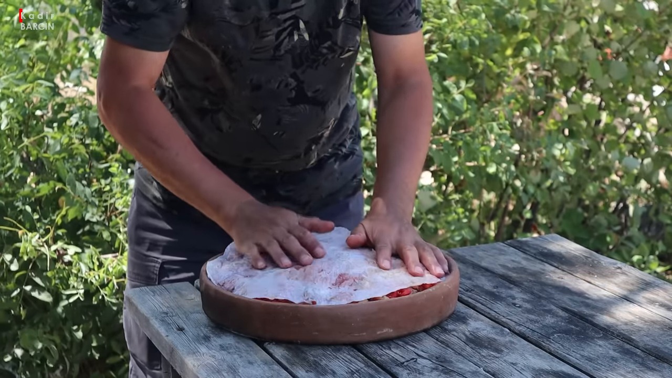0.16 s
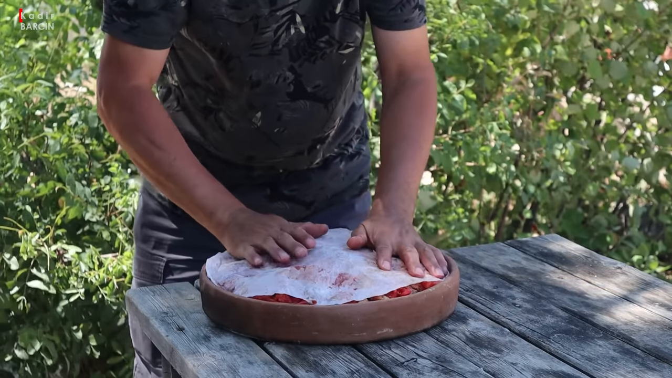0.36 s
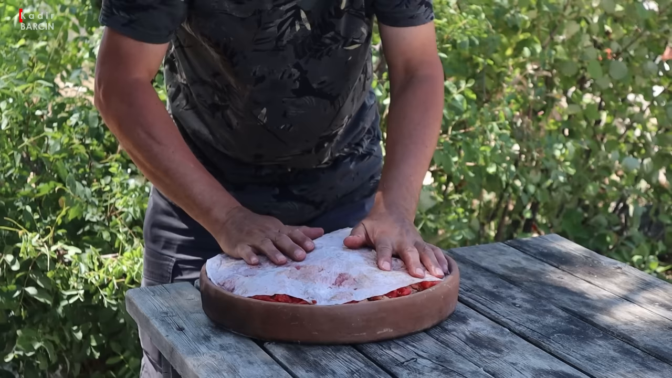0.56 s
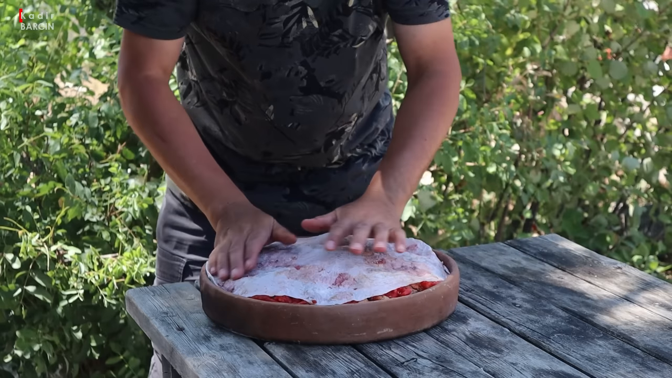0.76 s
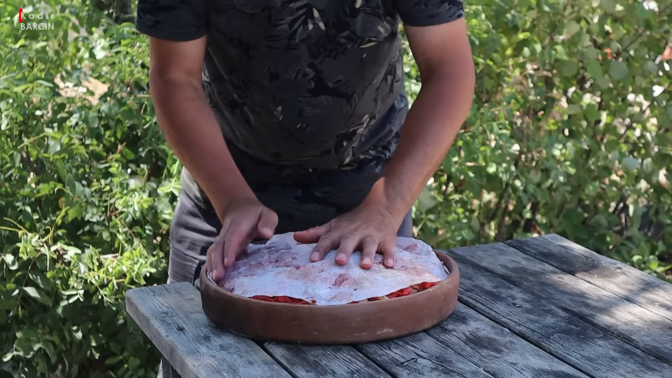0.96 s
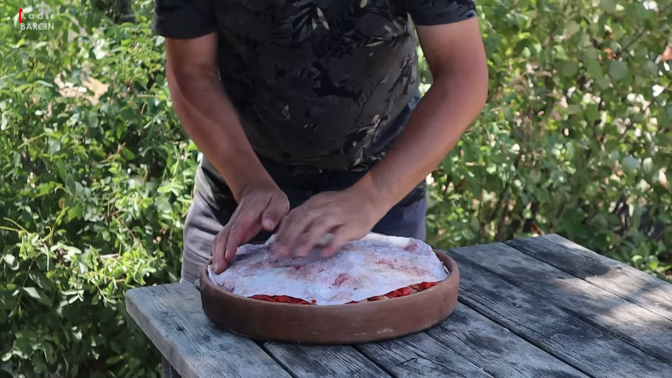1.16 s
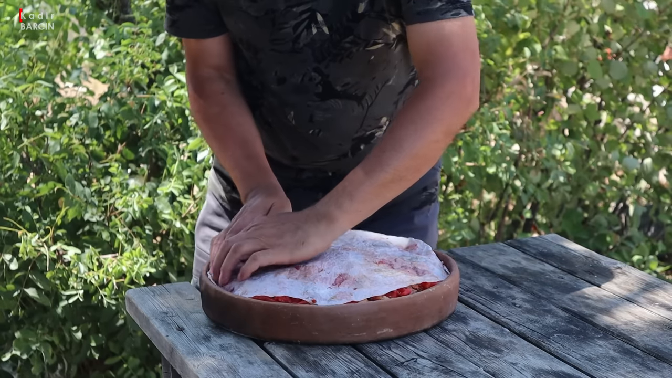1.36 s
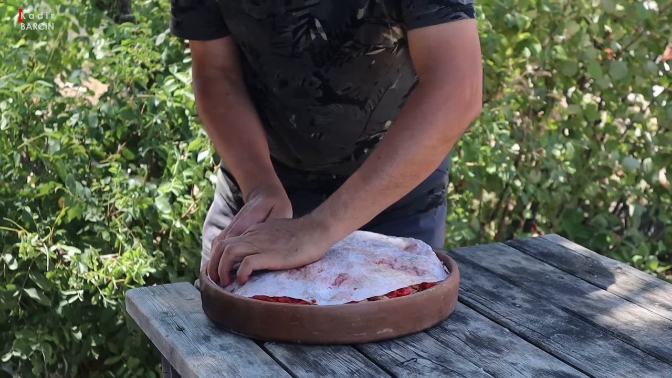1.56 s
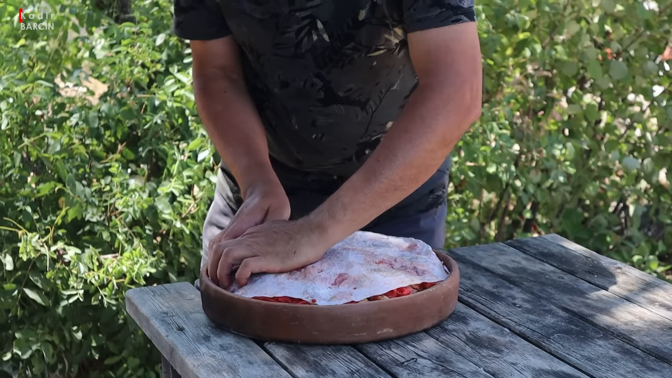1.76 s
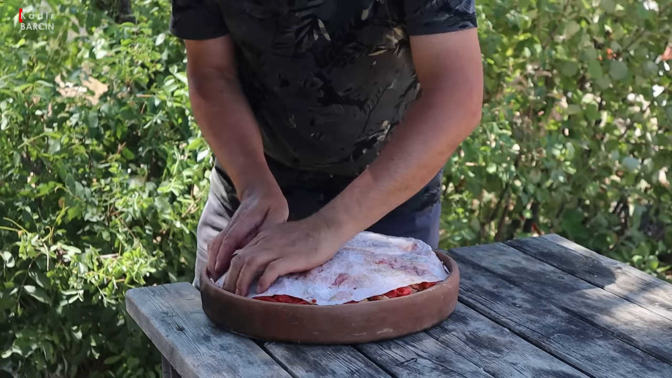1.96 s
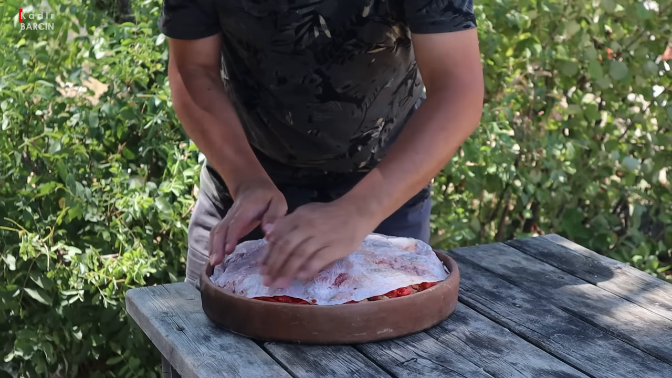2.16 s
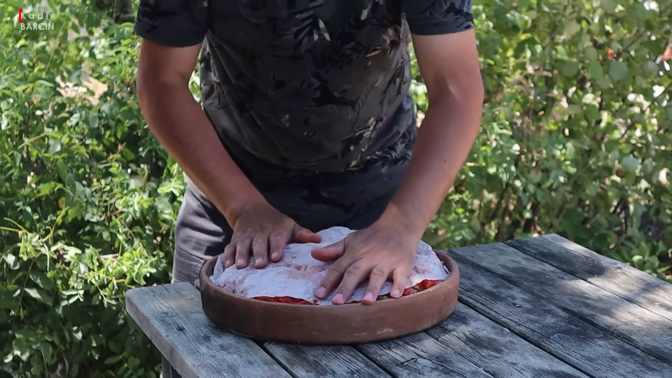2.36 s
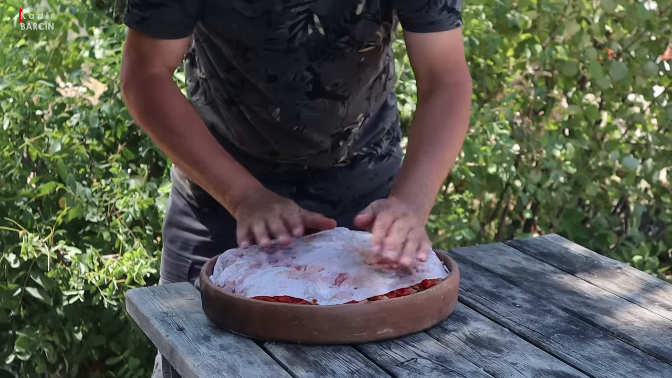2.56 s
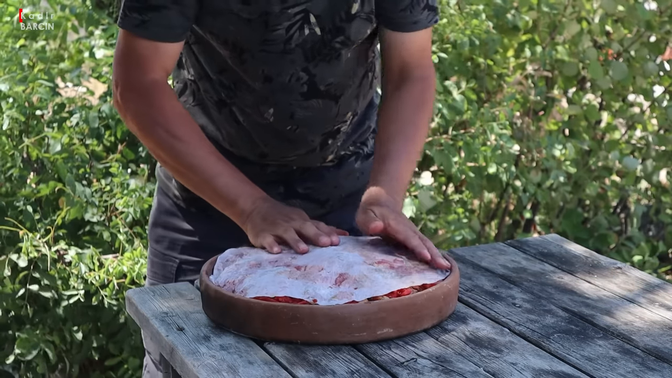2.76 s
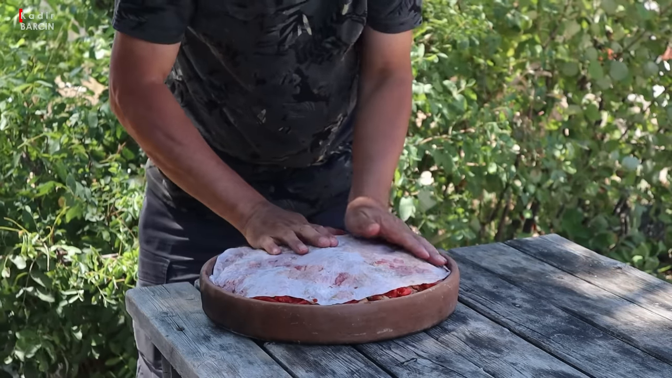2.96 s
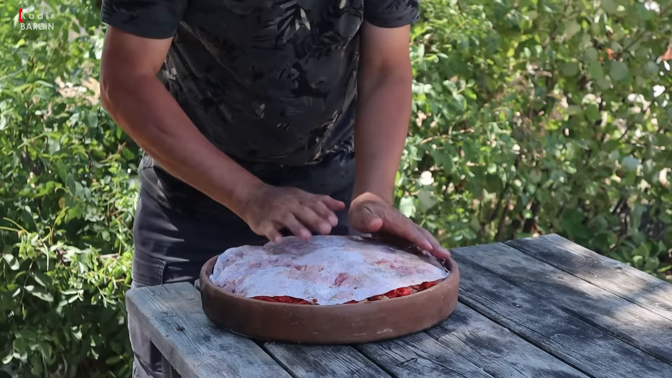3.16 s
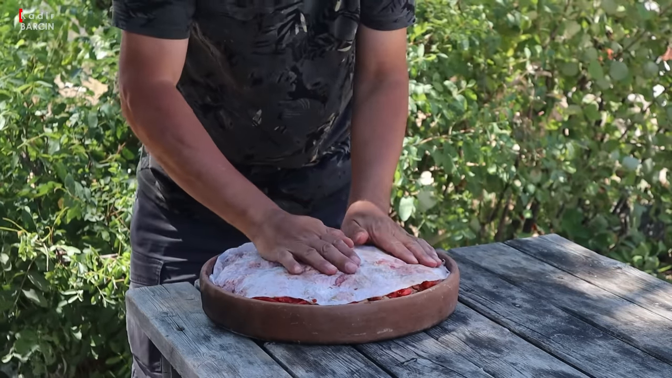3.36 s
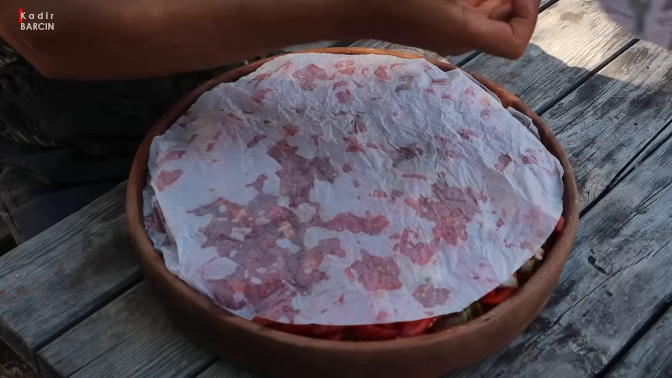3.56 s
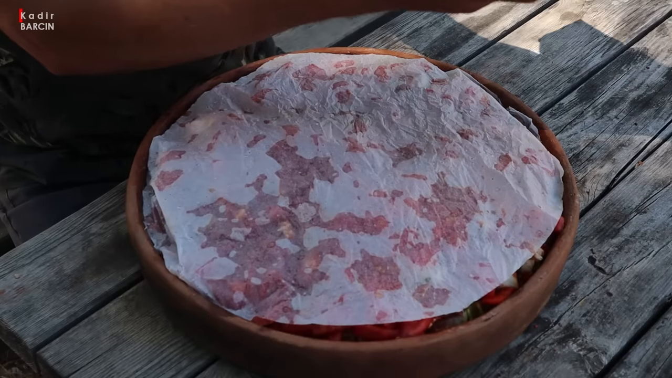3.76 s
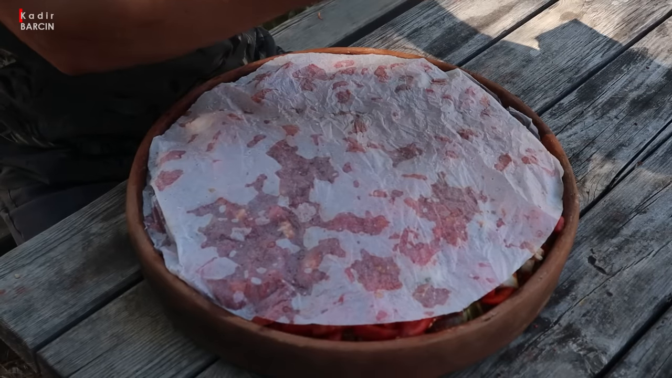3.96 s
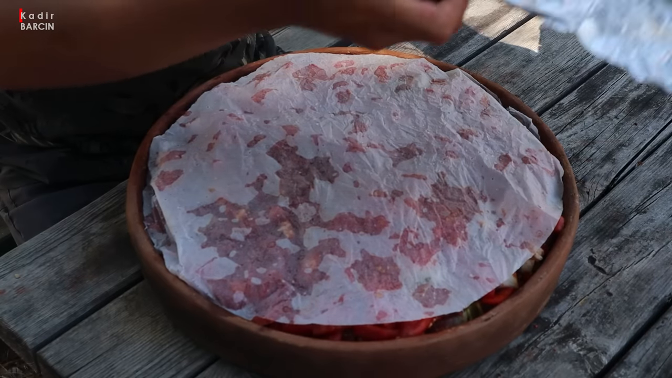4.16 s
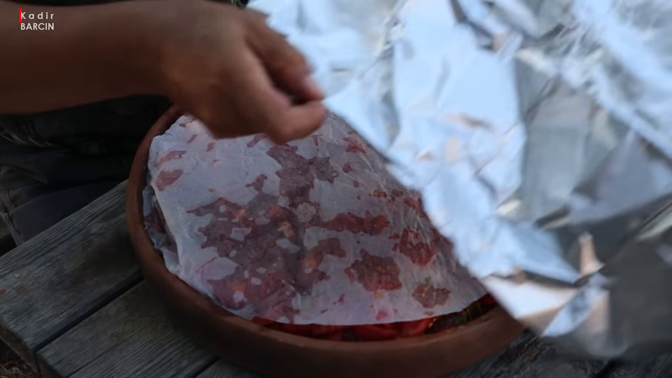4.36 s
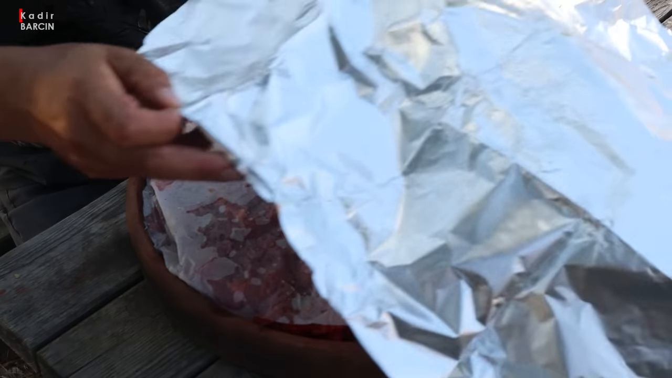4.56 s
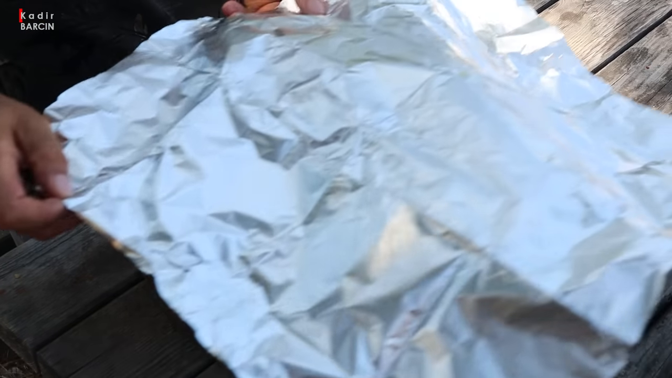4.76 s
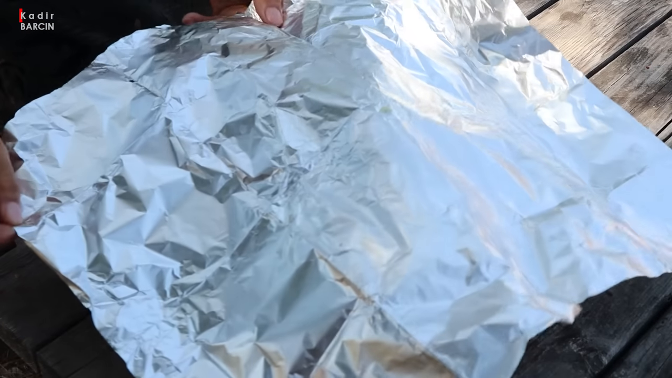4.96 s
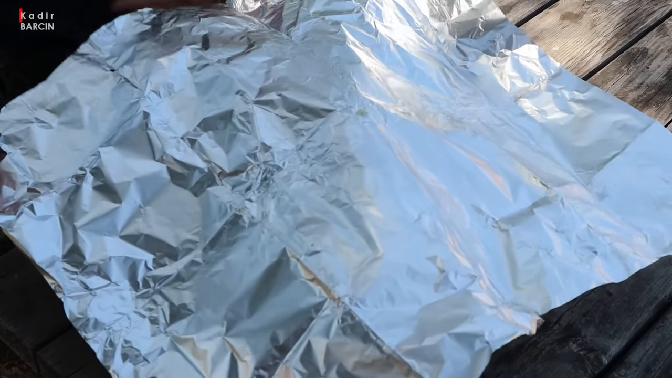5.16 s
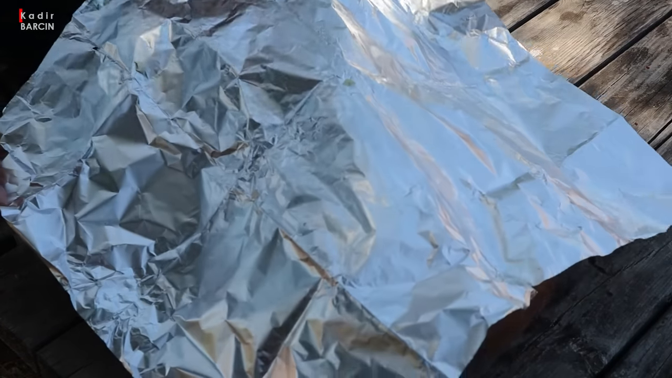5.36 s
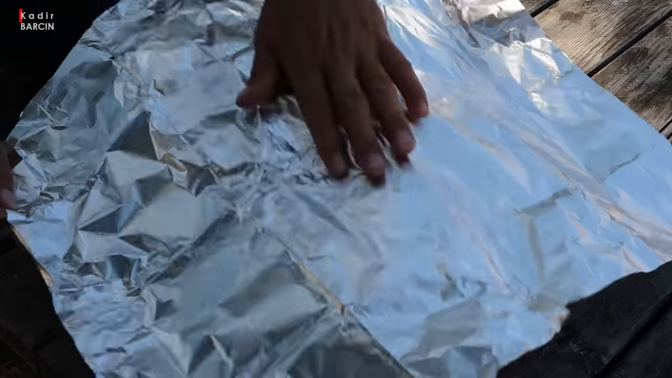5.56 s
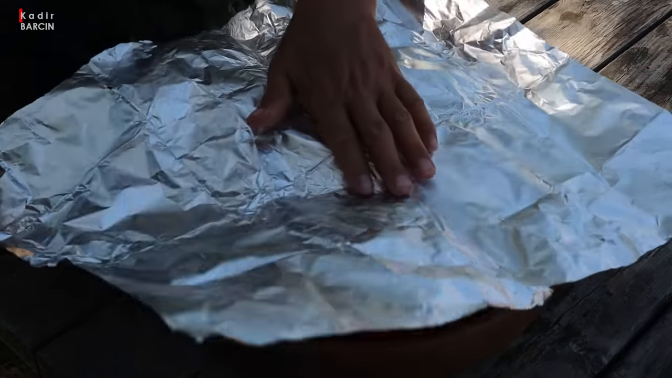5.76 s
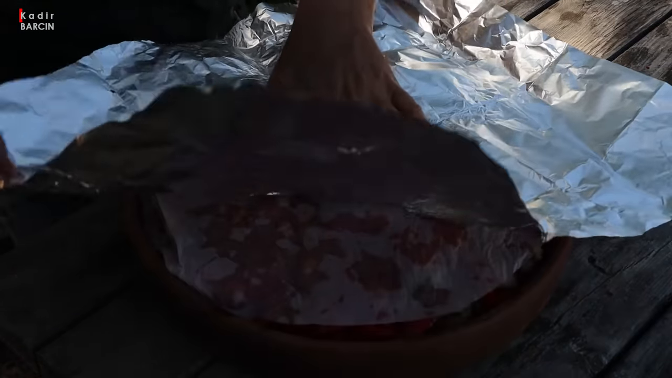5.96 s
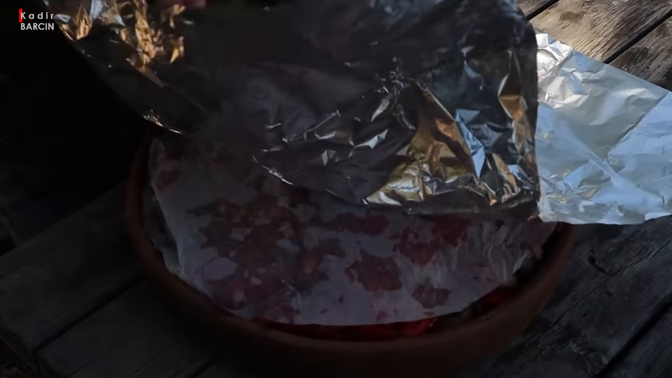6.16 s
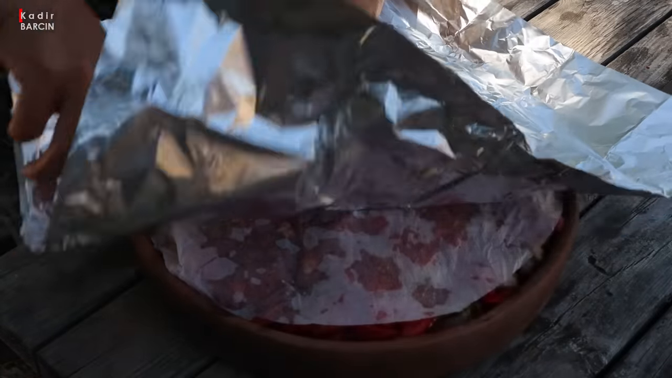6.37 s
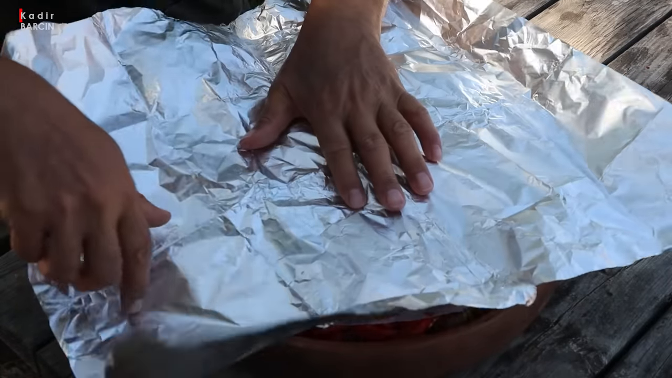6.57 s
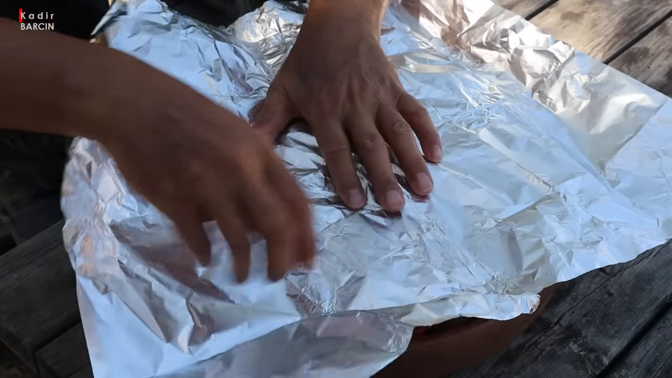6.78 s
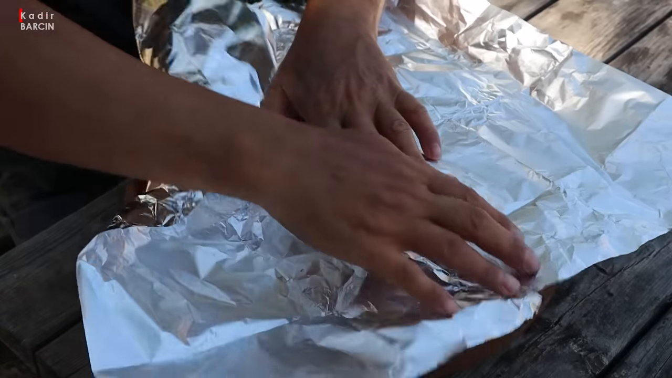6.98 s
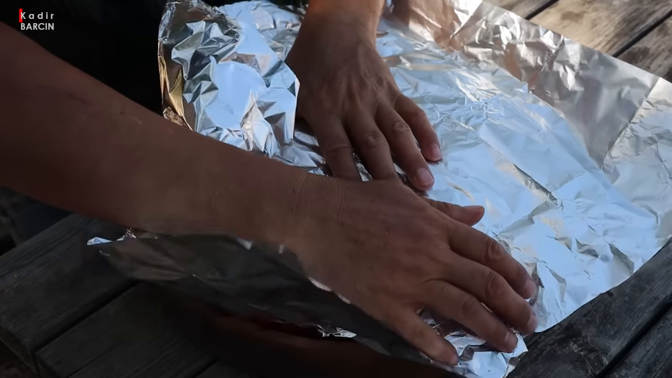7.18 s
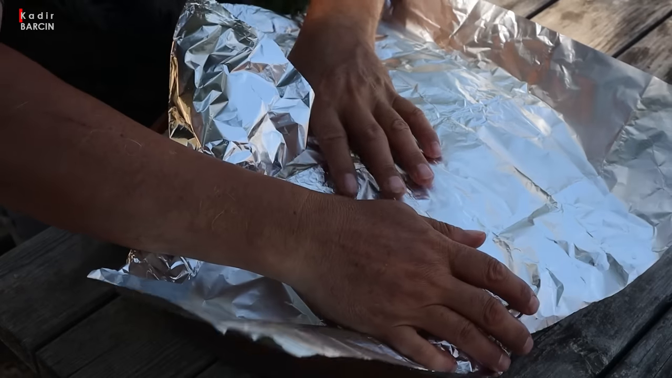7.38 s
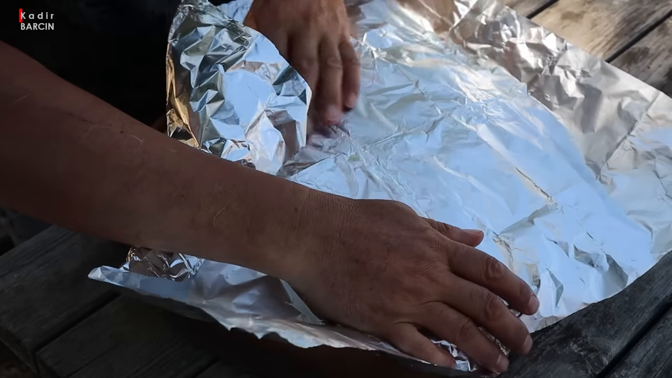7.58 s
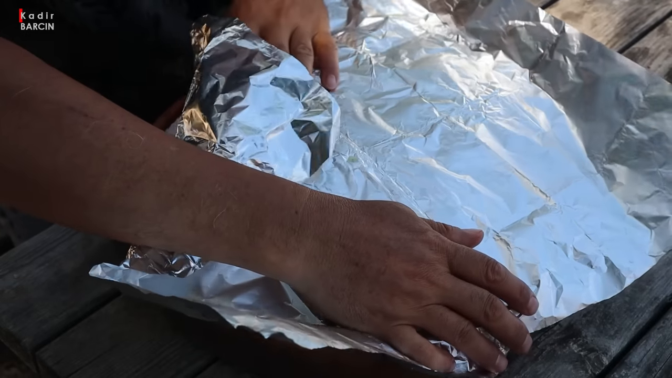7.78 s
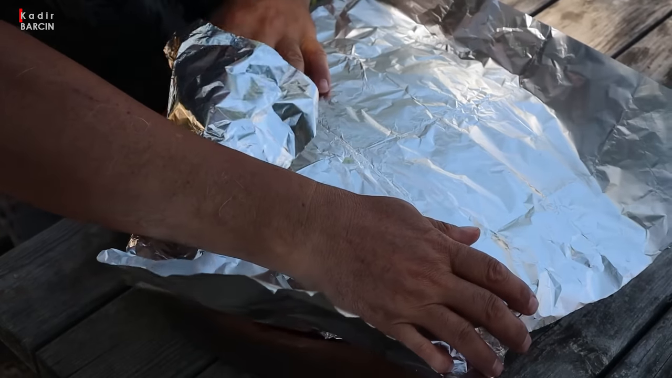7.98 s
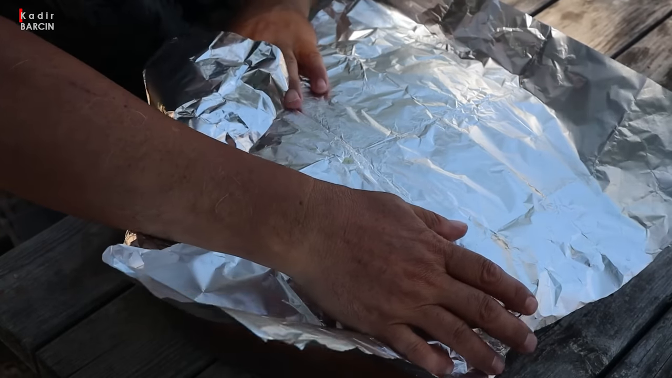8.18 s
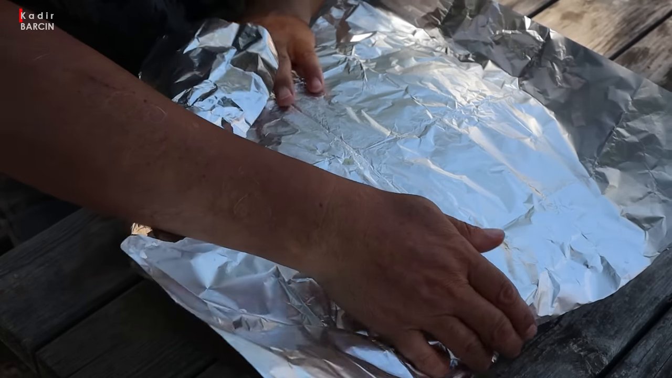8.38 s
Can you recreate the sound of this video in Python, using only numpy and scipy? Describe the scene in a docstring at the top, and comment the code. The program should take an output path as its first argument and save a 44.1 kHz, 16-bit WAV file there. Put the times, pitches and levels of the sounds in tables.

```python
"""A summer garden full of cicadas. First, hands pat and stroke damp baking paper onto a clay dish
while wind nudges the microphone. From 3.6 s, heard closer up, a sheet of aluminium foil is swung over
the dish and buckles with a few ringing pops (4.2-4.7 s). Then it crackles, snaps and bumps as it is
pressed down around the rim, and the breeze dies away. One microphone, the same in both ears."""
import sys
import numpy as np
from scipy import signal
from scipy.fft import rfft, irfft, next_fast_len
from scipy.io import wavfile

SR = 44100
rng = np.random.default_rng(int(sys.argv[2]) if len(sys.argv) > 2 else 0)


def log_audio(samples):
    """Write samples as a 16-bit WAV file to the path given in sys.argv[1]."""
    # one column per channel
    frames = np.atleast_2d(samples).T
    # limit to full scale, then quantise
    limited = np.clip(frames, -1, 1)
    pcm = np.round(limited * 32767).astype(np.int16)
    wavfile.write(sys.argv[1], SR, pcm)


N = 371763
T = np.arange(N) / SR


def undb(db):
    """Decibels to gain."""
    return 10 ** (np.asarray(db) / 20)


def curve(rows):
    """Gain over time from rows of t/s, level/dB."""
    return undb(np.interp(T, *np.transpose(rows)))


def unit(x):
    """Scale to rms 1."""
    return x / np.sqrt(np.mean(x ** 2))


def add(track, at_s, sound):
    """Mix a sound into a track."""
    i = max(int(at_s * SR), 0)
    track[i:i + len(sound)] += sound[:N - i]


def tint(x, colour):
    """Filter by rows of f/Hz, gain/dB; output rms 1."""
    hz, db = np.transpose(colour)
    size = next_fast_len(len(x))
    bins_hz = np.fft.rfftfreq(size, 1 / SR) + 1
    gain = undb(np.interp(np.log(bins_hz), np.log(hz), db))
    return unit(irfft(rfft(x, size) * gain, size)[:len(x)])


def noise(colour):
    """Coloured noise, rms 1."""
    return tint(rng.standard_normal(N), colour)


def resonate(x, hz, width_hz):
    """Two-pole resonance, unity gain at centre."""
    hz = min(hz, SR * .45)
    return signal.lfilter(*signal.iirpeak(hz, hz / min(width_hz, SR / 4), SR), x)


def fade(t60_s, size):
    """Exponential decay, size samples long."""
    return undb(-60 * T[:size] / t60_s)


def walk(rate_hz):
    """Smooth random drift, spread near 1."""
    return np.interp(T * rate_hz, np.arange(4096), rng.standard_normal(4096))


def swells(rows, attack_s, sag_db_per_s, release_s, rest_db=-100):
    """Gain from rows of t/s, length/s, level/dB: rise, sag, release to a resting level."""
    power = undb(rest_db) ** 2
    for start_s, length_s, db in rows:
        age_s = np.maximum(T - start_s, 0)
        shape = np.minimum(age_s / attack_s, 1) * np.exp(-np.maximum(age_s - length_s, 0) / release_s)
        power = power + (shape * undb(db - sag_db_per_s * np.minimum(age_s, length_s))) ** 2
    return np.sqrt(power)


def grit(scatter_db, size):
    """Dense run of tiny, uneven slips."""
    spread = np.repeat(rng.uniform(-1.7, 1.7, size // 16 + 1), 16)[:size]
    return unit(rng.standard_normal(size) * undb(scatter_db * spread))


def crinkle(colour, rate_hz, scatter_db, t60_s, avalanche, span_hz, pitched, facets=20):
    """Avalanches of clicks shared among facets, each with its own pitch and short ring."""
    strengths = undb(scatter_db * np.minimum(rng.exponential(size=N), 5))
    triggers = (rng.random(N) < 45 / SR) * rng.random(N)
    surge = signal.oaconvolve(triggers, fade(0.069, 4096))[:N]
    clicks = (rng.random(N) < rate_hz / SR) * strengths * rng.choice([-1, 1], N)
    clicks *= 1 + avalanche * surge
    facet, out = rng.integers(facets, size=N), 0
    for k, hz in enumerate(np.geomspace(*span_hz, facets)):
        ring = rng.standard_normal(1024) * fade(t60_s, 1024)
        ring = unit(ring) + pitched * unit(resonate(ring, hz, hz / 6))
        out = out + signal.oaconvolve(clicks * (facet == k), unit(ring))[:N]
    return tint(out, colour)


# air spectrum: f/Hz, gain/dB
AIR_EQ = [(20, -12), (60, -4), (130, -2.5), (230, -4), (400, -2), (550, 2), (720, -4), (900, -3),
          (1200, -9), (2000, -8), (3500, -6.5), (15000, -17.5)]


def open_air():
    """Faint, near-steady rush of the open air."""
    return noise(AIR_EQ) * undb(-49.5 + 0.25 * walk(6.2))


# hum tones: f/Hz, wide level/dB, close level/dB
HUM_TONES = [(381, -71.5, -70.5), (519, -64, -65), (559, -66, -58), (606, -68, -64), (687, -65.5, -69),
             (796, -70.5, -63)]


def far_hum(close):
    """Distant tones wavering in level and pitch."""
    out = 0
    for hz, wide_db, close_db in HUM_TONES:
        rms = undb(wide_db + (close_db - wide_db) * close + 4.7 * walk(6))
        cycles = np.cumsum(hz + 3 * walk(20)) / SR
        out = out + rms * np.sqrt(2) * np.sin(2 * np.pi * cycles)
    return out


# wind spectrum: f/Hz, gain/dB
WIND_EQ = [(15, -4.5), (35, -3), (80, -5), (140, -10.5), (220, -18.5), (350, -32.5), (700, -51),
           (2000, -80)]
# eddies: t/s, length/s, level/dB
EDDIES = [(0, 0.33, -28), (.44, 0.039, -35.5), (.74, .1, -36), (.84, 0.26, -34.5), (1.045, 0.26, -30),
          (1.28, 0.29, -34.5), (1.53, 0.28, -35.5), (1.96, 0.15, -38), (2.37, 0.16, -40.5),
          (2.64, 0.13, -39), (2.75, 0.26, -34.5), (3.37, 0.27, -38.5)]
# dying breeze: t/s, level/dB
BREEZE_LEVELS = [(3.6, -52), (5.2, -55.5), (6.2, -57), (6.7, -69), (8.4, -86)]


def wind(close):
    """Eddies buffet the microphone; close up, only a dying breeze."""
    gusts = swells(EDDIES, attack_s=0.025, sag_db_per_s=31, release_s=0.051, rest_db=-53)
    flutter = undb(1.9 * walk(22))
    return noise(WIND_EQ) * ((1 - close) * gusts * flutter + close * curve(BREEZE_LEVELS))


# chorus spectra, wide and close: f/Hz, gain/dB
CHORUS_WIDE_EQ = [(2500, -64), (3600, -23.5), (4100, -10.5), (4550, -5), (5000, -6), (5600, -2), (6700, 1),
                  (8100, -0.5), (9000, -7), (10500, -14), (13000, -25), (15500, -35)]
CHORUS_CLOSE_EQ = [(2500, -29), (3800, -13.5), (4300, -7.5), (4580, -3), (4900, -7.5), (5700, -1),
                   (6600, 1.5), (7400, -0.5), (8500, -8), (10000, -15), (12000, -30), (15500, -39)]
# wide chorus envelope: t/s, level/dB
CHORUS_LEVELS = [(0, -29), (1, -28.5), (1.4, -30), (2.35, -30.5), (2.9, -29.5), (3.6, -30.5)]


def cicada_chorus(colour, throb, flicker_db):
    """Far cicadas merge into a hiss; the strongest throb through it."""
    beat_hz = 6.6 * (1 + .04 * walk(1.5))
    beat = np.sin(2 * np.pi * np.cumsum(beat_hz) / SR)
    hiss = noise(colour)
    throbbing = resonate(noise(colour), hz=5160, width_hz=2650) * (1 + throb * beat)
    return unit(hiss * undb(flicker_db * walk(24.9)) + throbbing)


def chirping_cicada(first_s=.045, rate_hz=5.38, hurry_hz_per_s=.125, fade_db_per_s=1.5, width_s=0.031):
    """One cicada's soft-edged rasps, slowly faster and fainter."""
    age_s = T - first_s
    beats = rate_hz * age_s + hurry_hz_per_s * age_s ** 2 / 2
    off_beat_s = (beats - np.round(beats)) / rate_hz
    envelope = undb(-32.5 - fade_db_per_s * age_s) * np.exp(-.5 * (off_beat_s / width_s) ** 2)
    colour = [(2000, -70), (4500, -34), (5200, -13), (5550, 2.5), (6100, -8), (7000, -19),
              (8000, 0.5), (9500, -31)]
    return noise(colour) * envelope


def tymbal(modes, stroke_hz, rib_hz, ribs=6, echo_s=.0071):
    """Each stroke buckles a row of ribs; the clicks ring the modes and bounce off the ground."""
    clicks = np.zeros(N)
    cycles = np.cumsum(stroke_hz * (1 + .004 * walk(8))) / SR
    strokes = np.flatnonzero(np.diff(np.floor(cycles)))
    for rib in range(ribs):
        lag_s = rib / rib_hz + .00006 * rng.standard_normal(len(strokes))
        at = np.clip((strokes + lag_s * SR).astype(int), 0, N - 1)
        clicks[at] += undb(0.91 * rng.standard_normal(len(strokes)))
    song = sum(undb(db) * resonate(resonate(clicks, hz, width_hz), hz, width_hz)
               for hz, width_hz, db in modes)
    return unit(song + 0.71 * np.roll(song, int(echo_s * SR)))


# nearest cicada's tymbal: f/Hz, width/Hz, gain/dB
SOLO_MODES = [(9680, 1200, -3.5), (10330, 1080, 1), (10870, 570, -2), (11630, 800, -2.5),
              (12400, 950, -10.5)]
# songs of the two near cicadas: t/s, length/s, level/dB
SOLO_PHRASES = [(-.2, 1.26, -34.5), (1.13, 2.5, -34.5)]
JOINER_PHRASES = [(1.2, 2.4, -37)]


def near_cicadas(attack_s=0.16, release_s=0.011):
    """One sings, pauses and resumes; a second joins with a narrow whistle and tires."""
    solo = tymbal(SOLO_MODES, stroke_hz=177.6, rib_hz=1316)
    solo *= swells(SOLO_PHRASES, attack_s, sag_db_per_s=0, release_s=release_s)
    joiner = tymbal([(9680, 350, -1), (11040, 460, -7)], stroke_hz=183.5, rib_hz=1395)
    joiner *= swells(JOINER_PHRASES, attack_s, sag_db_per_s=6, release_s=release_s)
    return solo + joiner


# palm strokes: t/s, length/s, level/dB
PALM_STROKES = [(.24, 0.072, -46), (.87, 0.2, -44), (1.25, 0.13, -48), (1.67, 0.071, -49),
                (1.83, 0.064, -48.5), (2.02, 0.065, -44.5), (2.17, .05, -54), (2.52, .05, -52),
                (2.7, .28, -56)]


def paper_strokes():
    """Fine scraping of a palm sliding over paper."""
    colour = [(200, -24), (700, -3), (1400, -3), (2600, 4.5), (4000, -3), (8000, 1), (15000, -18)]
    scrape = crinkle(colour, rate_hz=700, scatter_db=2.5, t60_s=0.016, avalanche=0.77,
                     span_hz=(1210, 4540), pitched=0.96)
    return scrape * swells(PALM_STROKES, attack_s=.03, sag_db_per_s=3, release_s=0.019, rest_db=-57.5)


# hand pats: t/s, peak/dB, f/Hz
HAND_PATS = [(0.1994, -28, 3000), (.3192, -35, 3250), (.4988, -35, 2560), (.5641, -35.5, 2440),
             (0.6894, -35, 2500), (.8606, -28, 1680), (0.9017, -27, 2410), (1.0022, -26.5, 2080),
             (1.07, -27, 1730), (1.2448, -23, 2800), (1.3124, -34, 2710), (1.377, -33, 2890),
             (1.476, -31, 2320), (1.695, -26, 3300), (2.036, -26.5, 2380), (2.396, -28, 3330),
             (2.454, -32, 1900), (2.7811, -30, 3770), (2.8217, -29, 1380), (3.0841, -29.5, 1898),
             (3.2221, -36, 3490), (3.389, -34.5, 1390), (3.4585, -30, 1490), (3.506, -31.5, 3030)]


def paper_pats(t60_s=0.13, size=12000):
    """Damp paper gives a soft, gritty rustle under each touch."""
    out = np.zeros(N)
    for at_s, db, hz in HAND_PATS:
        slips = grit(6.2, size) * fade(t60_s, size)
        rustle = resonate(resonate(slips, hz, 0.93 * hz), hz, 9.7 * hz)
        add(out, at_s, undb(db) * rustle / np.abs(rustle).max())
    return out


# foil pushed against the dish: t/s, level/dB, T60/s
DISH_BUMPS = [(5.622, -30, 0.09), (6.248, -31, 0.068), (6.356, -30, 0.089), (6.387, -32, 0.12),
              (6.421, -34.5, 0.16), (7.356, -34.5, 0.096), (7.70, -39, 0.13), (7.8, -43, 0.24),
              (7.96, -40, 0.31), (8.116, -31.5, .07), (8.235, -40, .15)]


def dish_thuds(attack_s=0.0011, size=9000):
    """The covered dish answers a push with a soft, hollow bump."""
    out = np.zeros(N)
    colour = [(40, -32), (110, -8), (200, -7), (340, 0), (600, -4), (1200, -22), (4000, -40)]
    onset = 1 - np.exp(-T[:size] / attack_s)
    for at_s, db, t60_s in DISH_BUMPS:
        add(out, at_s, undb(db) * tint(grit(2.4, size), colour) * fade(t60_s, size) * onset)
    return out


# facet flips: t/s, peak/dB, f/Hz
FACET_FLIPS = [(2.878, -27, 1470), (7.1648, -15.5, 1400), (7.356, -18.5, 3460), (7.37, -14.5, 2350),
               (7.4345, -17, 2640), (7.441, -14, 1580), (7.483, -14, 1910), (7.613, -25, 1830),
               (7.73, -19, 2070), (8.2057, -21, 2650), (8.247, -14.5, 1660), (8.3973, -14, 2120)]


def facet_ticks(t60_s=0.016, size=3000):
    """A paper or foil facet flips under a finger with a damped, pitched tick."""
    out = np.zeros(N)
    for at_s, db, hz in FACET_FLIPS:
        burst = rng.standard_normal(size) * fade(t60_s, size)
        tick = resonate(resonate(burst, hz, 0.55 * hz), hz, 0.97 * hz)
        add(out, at_s, undb(db) * tick / np.abs(tick).max())
    return out


# crease and panel spectra: f/Hz, gain/dB
CREASE_EQ = [(30, -42), (200, -19), (700, -15), (2000, -1), (4000, 0), (6000, -1), (7500, 5.5), (8800, 6),
             (10200, -3), (11500, -1), (13300, 3), (14600, -0.5), (15700, -4)]
PANEL_EQ = [(20, -43), (60, -28), (150, -25), (240, -14.5), (340, -1.5), (450, -4), (600, -4.5),
            (1100, -1.5), (1600, 1), (2500, 0), (3500, 0), (5000, -6), (9000, -17)]
# hands lift or push the foil: t/s, length/s, crease level/dB, panel level/dB
FOIL_PUSHES = [(3.606, 0.083, -23.5, -33), (3.816, .09, -27.5, -42), (3.936, 0.046, -25, -30),
               (4.035, .1, -32, -30.5), (4.23, .125, -27, -31), (4.436, 0.035, -21, -36),
               (4.568, 0.054, -28, -30), (4.718, 0.04, -25, -36), (4.956, 0.053, -26.5, -33),
               (5.022, 0.079, -21.5, -27), (5.146, 0.064, -23, -31), (5.386, 0.036, -27, -36.5),
               (5.54, .055, -23.5, -28.5), (5.597, .06, -16.5, -28), (5.736, .11, -19.5, -30),
               (5.888, 0.05, -17.5, -44), (6.035, 0.14, -21.5, -35), (6.339, 0.11, -15, -30),
               (6.479, 0.1, -18, -33), (6.594, 0.23, -23.5, -51), (6.962, .03, -19.5, -44),
               (7.068, 0.14, -20.5, -33), (7.226, 0.2, -24.5, -32), (7.433, 0.059, -24.5, -36.5),
               (7.67, 0.048, -22.5, -30), (7.779, .245, -25, -30.5), (8.07, 0.065, -27, -33.5),
               (8.217, 0.085, -30, -35.5)]
# sheet tumbles in the air: t/s, length/s, panel level/dB
FOIL_TUMBLES = [(4.306, .1, -24), (4.443, 0.086, -29), (4.635, 0.053, -24.5)]


def foil_crackle():
    """New creases crackle brightly, the panels between them rustle lower; held foil is never still."""
    creases = crinkle(CREASE_EQ, rate_hz=1500, scatter_db=1.0, t60_s=0.024, avalanche=0.77,
                      span_hz=(3880, 14800), pitched=0.35)
    panels = crinkle(PANEL_EQ, rate_hz=800, scatter_db=2.5, t60_s=0.031, avalanche=0.37,
                     span_hz=(732, 4460), pitched=0.6)
    shape = dict(attack_s=0.02, sag_db_per_s=13.5, release_s=.04)
    creasing = [(at_s, length_s, db) for at_s, length_s, db, _ in FOIL_PUSHES]
    flexing = [(at_s, length_s, db) for at_s, length_s, _, db in FOIL_PUSHES] + FOIL_TUMBLES
    creases *= swells(creasing, **shape, rest_db=-30.5)
    panels *= swells(flexing, **shape, rest_db=-39.5)
    return creases + panels


# creases snapping through: t/s, level/dB, T60/s
CREASE_SNAPS = [(1.378, -33, .02), (2.037, -38, .06), (2.784, -37, .04), (3.224, -35, .02),
                (3.53, -30, .02), (4.072, -24, .04), (4.814, -27, .03), (4.872, -24, .03),
                (5.043, -21, .05), (5.176, -16, .07), (5.562, -24, .043), (5.613, -20.5, 0.11),
                (5.631, -23, .084), (5.773, -16.5, 0.11), (5.932, -24, .05), (6.099, -14, 0.043),
                (6.249, -17, 0.062), (6.358, -14.5, .048), (6.398, -14.5, 0.091), (6.521, -14, 0.16),
                (6.565, -11.5, .07), (6.825, -20, .04), (6.976, -18, .06), (7.328, -18, 0.058),
                (7.356, -12.5, .024), (7.442, -9, .005), (8.116, -6.5, 0.03), (8.39, -17, .015)]


def crease_snaps(panel_db=-24, size=8000):
    """A paper or foil crease gives way in an avalanche of slips, shaking nearby panels."""
    out = np.zeros(N)
    for at_s, db, t60_s in CREASE_SNAPS:
        slips = grit(3.5, size) * fade(t60_s, size)
        snap = tint(slips, CREASE_EQ) + undb(panel_db) * tint(slips, PANEL_EQ)
        add(out, at_s, undb(db) * np.std(slips) * snap)
    return out


# clatter spectrum: f/Hz, gain/dB
POP_EQ = [(20, -40), (60, -5), (160, 8.5), (500, 13), (1500, 4), (3000, 3.5), (5000, 6.5), (8000, 6.5),
          (14000, -12)]
# free sheet modes: f/Hz, gain/dB, T60/s
SHEET_MODES = [(495, 4, .3), (646, 3, .3), (706, 1.5, .3), (953, -3, .2), (1030, -5, .24), (1347, 4, .32),
               (1424, -.5, .2), (1500, -2, .15), (1575, 0, .18), (1679, 1.5, .22), (1810, -4, .32),
               (1925, -4, .35), (2137, .5, .4), (2250, -5, .19), (2565, -7, .28), (2795, 4, .17),
               (2940, -2.5, .16), (3280, -7, .27), (3570, .5, .25), (3665, 0, .25), (4465, 1.5, .2),
               (4650, -1.5, .16)]
# buckling panels: t/s, level/dB, f/Hz, clatter T60/s, ring gain/dB
BUCKLES = [(4.236, -19, 3550, 0.26, -6), (4.304, -19, 1700, 0.26, -4), (4.307, -24, 4460, 0.12, 0.5),
           (4.369, -15, 1520, 0.25, -7), (4.373, -30.5, 2800, 0.12, 4), (4.440, -31, 1270, 0.088, 6),
           (4.490, -18, 1010, 0.24, -5.5), (4.496, -19.5, 1420, 0.49, -0.5), (4.629, -25, 3550, .1, 3.5),
           (4.646, -18, 1340, 0.17, -9.5), (4.652, -23.5, 2330, 0.09, 4)]


def foil_pops(attack_s=0.00075, settle_s=0.038, size=24000):
    """A panel of the free sheet flips with a clatter and rings the modes near its own pitch."""
    out, t = np.zeros(N), T[:size]
    onset = 1 - np.exp(-t / attack_s)
    for at_s, db, hz, t60_s, ring_db in BUCKLES:
        clatter = tint(grit(3.0, size), POP_EQ)
        clatter = unit(0.35 * clatter + resonate(clatter, hz, 0.9 * hz)) * fade(t60_s, size)
        ring = 0
        for mode_hz, mode_db, mode_t60_s in SHEET_MODES:
            nearness = 0.14 + 1 / (1 + (np.log2(mode_hz / hz) / .3) ** 2)
            bend = 1 + 0.0028 * rng.standard_normal() * np.exp(-t / settle_s)  # tension settles
            tone = np.sin(2 * np.pi * (mode_hz * np.cumsum(bend) / SR + rng.random()))
            ring = ring + nearness * undb(mode_db) * fade(mode_t60_s, size) * tone
        add(out, at_s, undb(db) * (clatter + undb(ring_db) * ring) * onset)
    return out


def scene(close_s=3.607, crossfade_s=.008):
    """Wide scene with paper, then close scene with foil; air and hum under both."""
    close = np.clip((T - close_s) / crossfade_s + .5, 0, 1)
    wide_mix = cicada_chorus(CHORUS_WIDE_EQ, throb=0.039, flicker_db=0.9) * curve(CHORUS_LEVELS)
    wide_mix += chirping_cicada() + near_cicadas() + paper_strokes() + paper_pats()
    close_mix = cicada_chorus(CHORUS_CLOSE_EQ, throb=0.23, flicker_db=0.5) * undb(-24.5)
    close_mix += dish_thuds() + foil_crackle() + foil_pops()
    background = open_air() + far_hum(close) + wind(close)
    mono = background + (1 - close) * wide_mix + close * close_mix + facet_ticks() + crease_snaps()
    return np.array([mono, mono])


def record(dry):
    """Soft peak limiting, then a steep low-pass."""
    ceiling, cutoff_hz = .72, 15700
    rounded = dry / (1 + (dry / ceiling) ** 4) ** .25
    return signal.sosfilt(signal.ellip(12, .1, 80, cutoff_hz, fs=SR, output="sos"), rounded)


dry = scene()
out = record(dry)
log_audio(out)
```